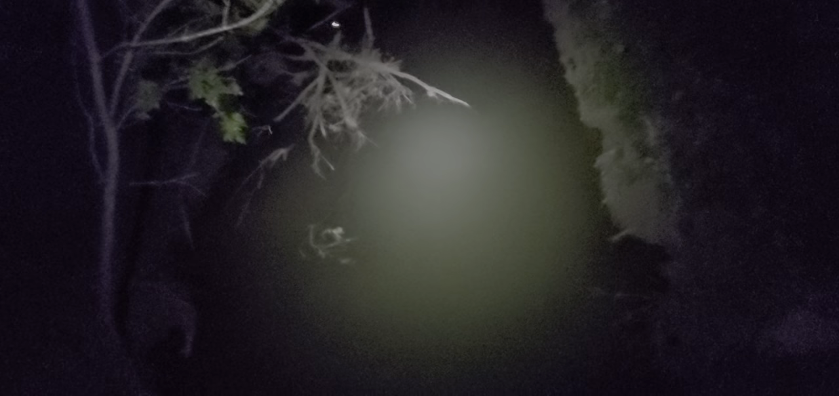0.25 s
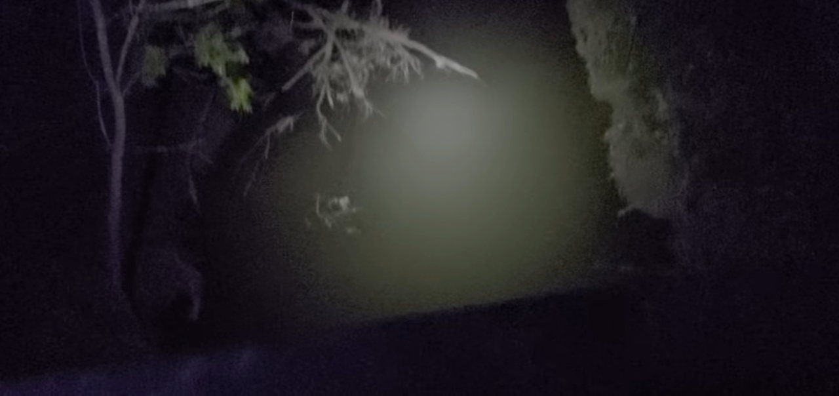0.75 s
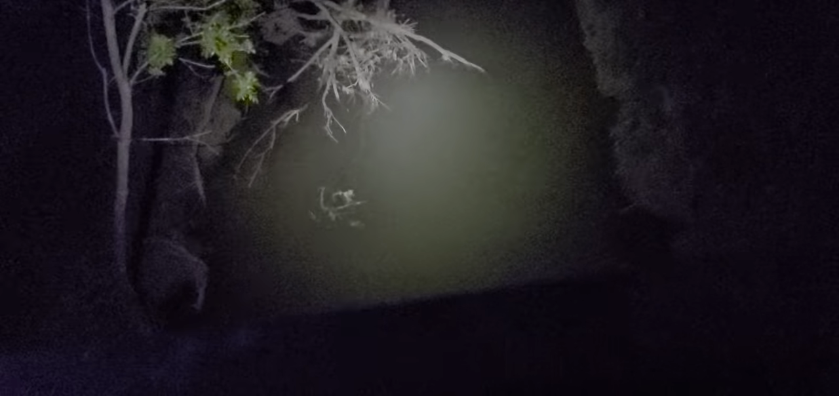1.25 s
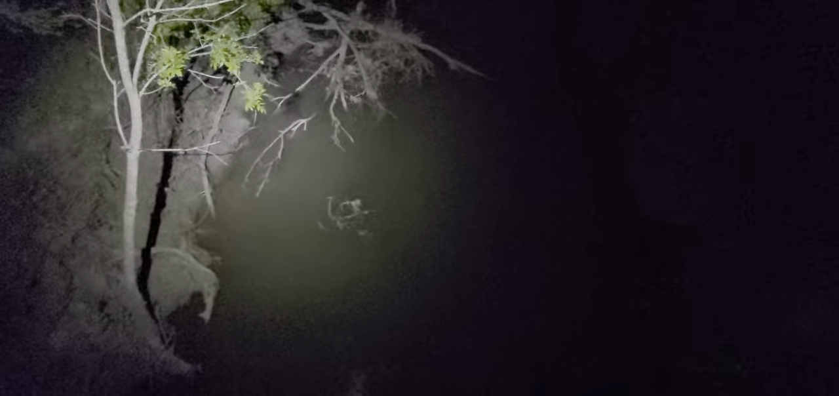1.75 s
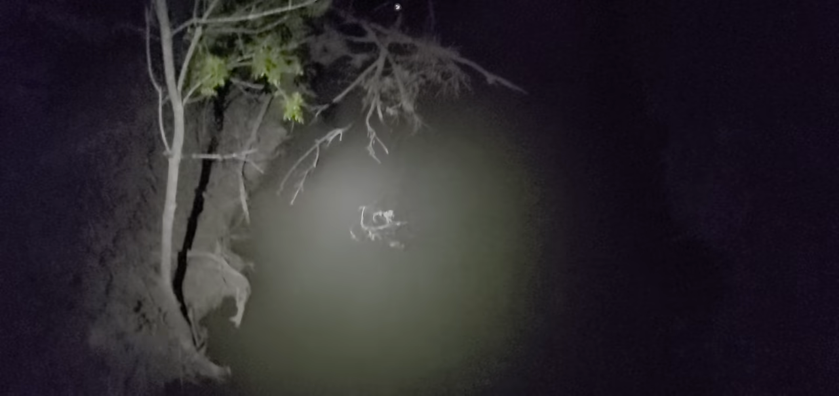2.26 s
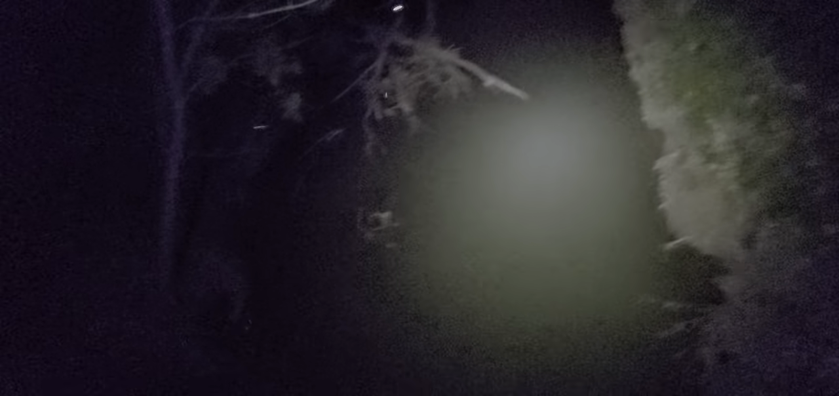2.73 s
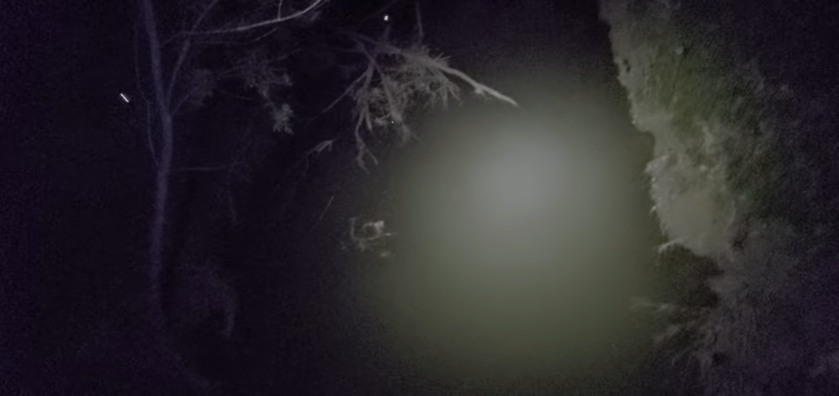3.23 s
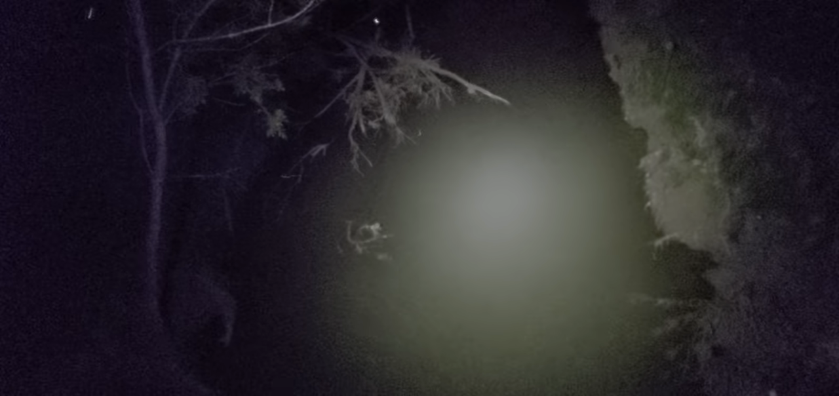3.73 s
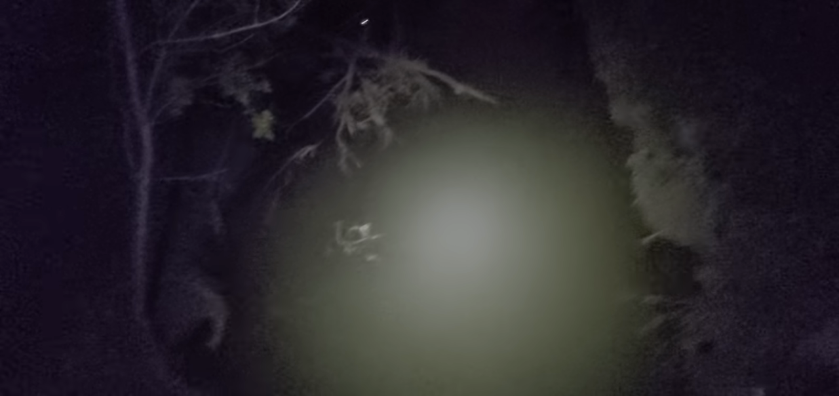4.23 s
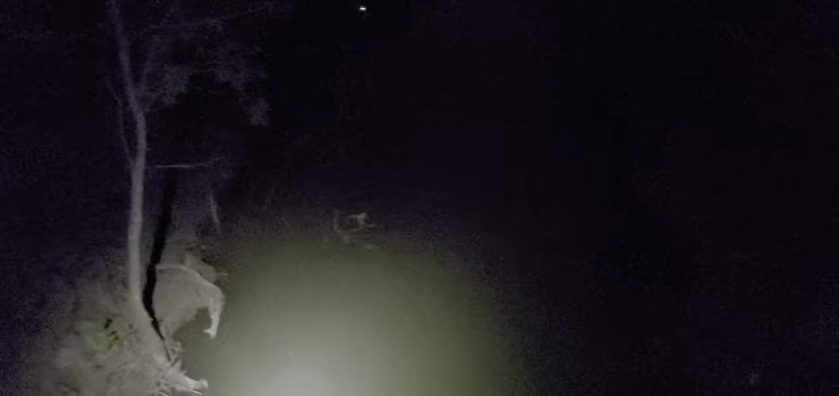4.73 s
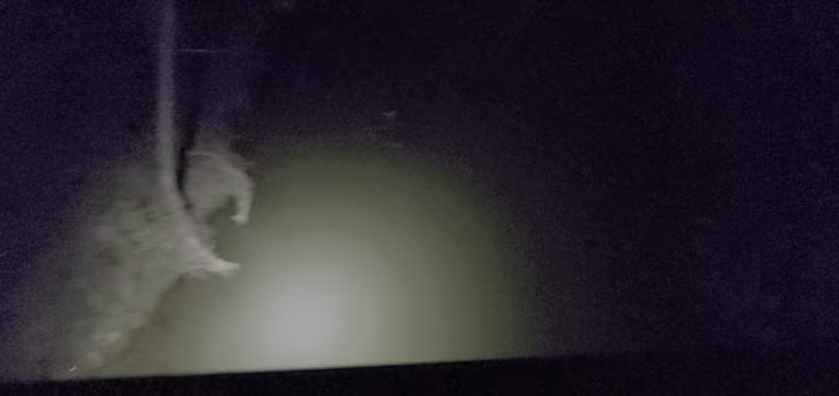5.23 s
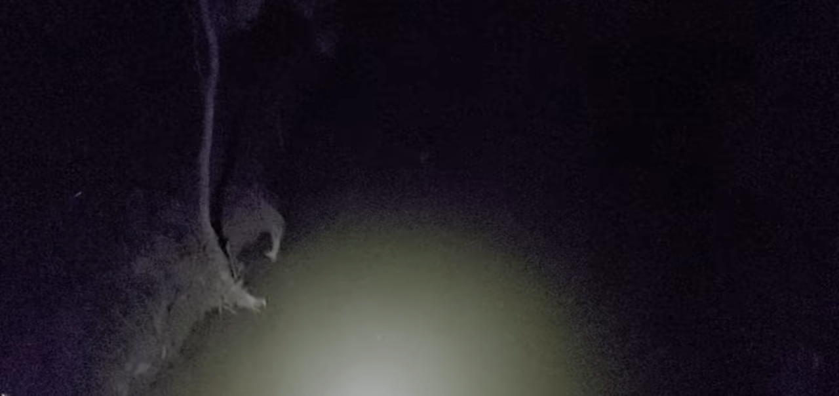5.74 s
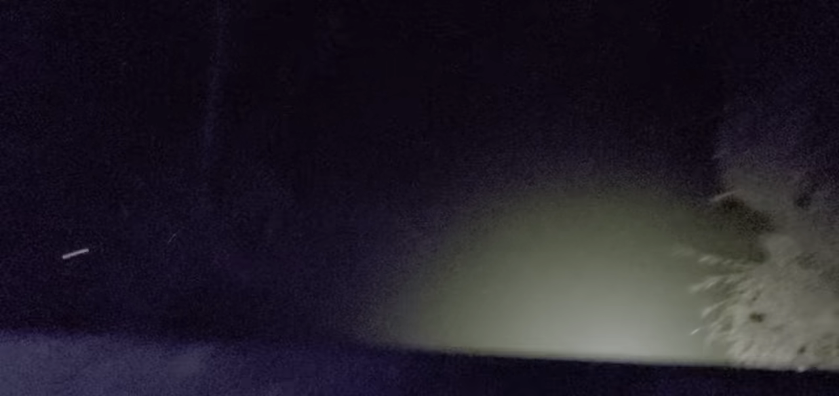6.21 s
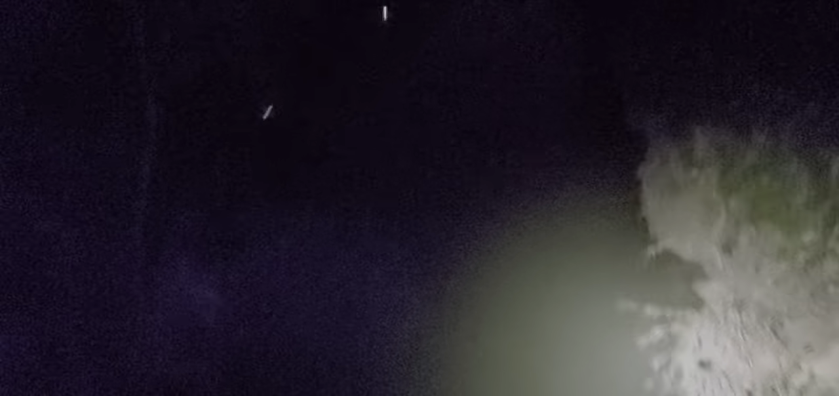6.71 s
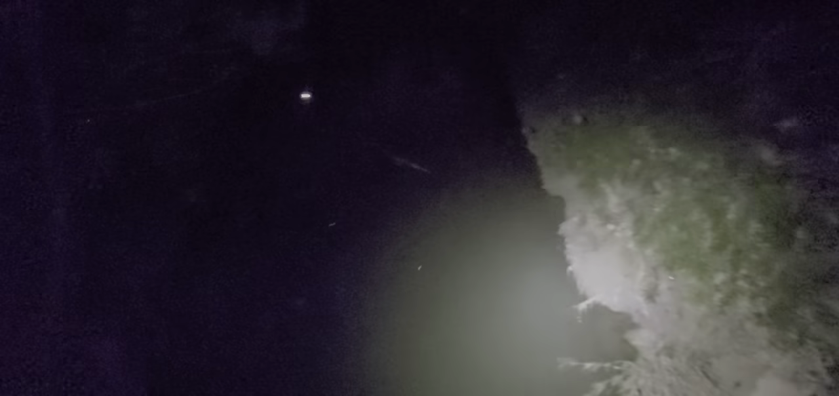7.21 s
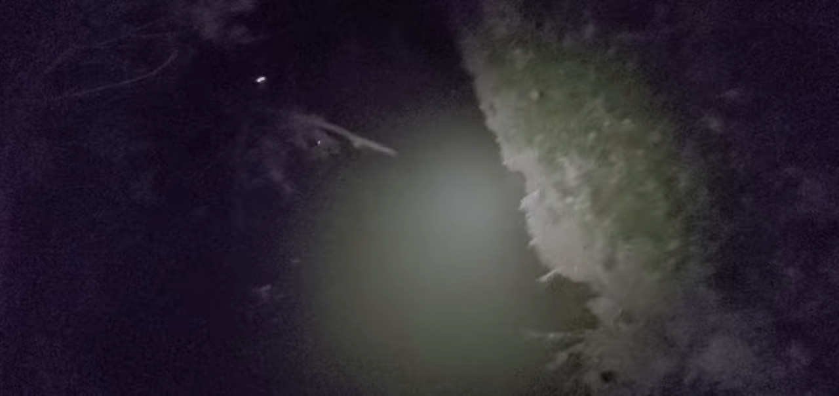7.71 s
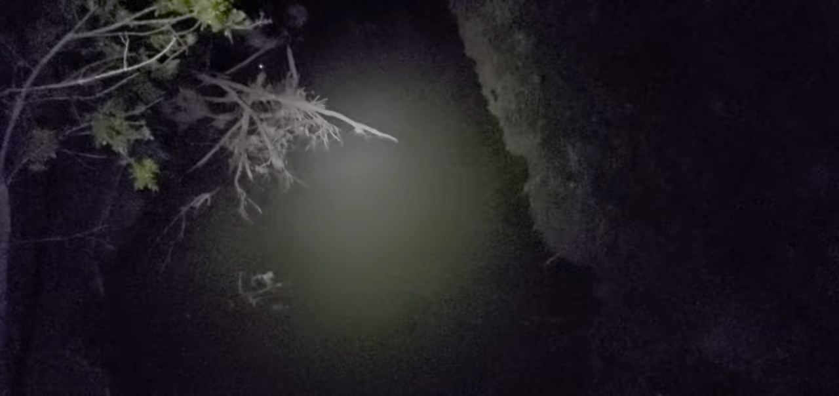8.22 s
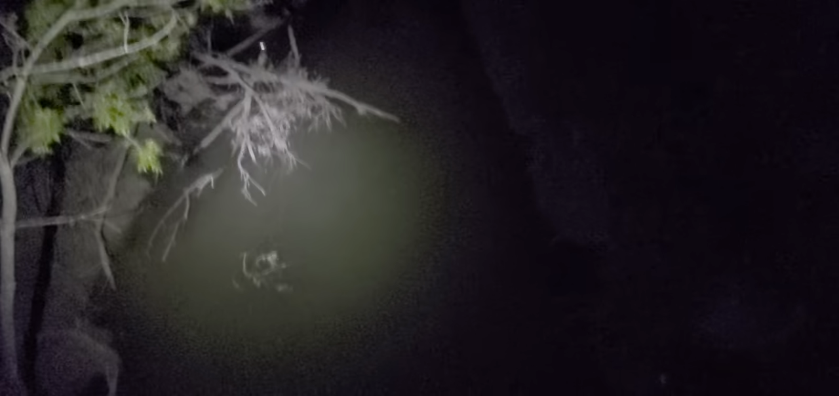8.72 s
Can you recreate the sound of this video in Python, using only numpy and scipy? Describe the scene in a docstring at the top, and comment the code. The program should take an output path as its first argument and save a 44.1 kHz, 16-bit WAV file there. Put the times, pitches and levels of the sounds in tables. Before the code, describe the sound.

Crickets trill and chirp at night by a murmuring creek over a low rumble, with a few sharp handling clicks and finger rubs.

```python
"""Crickets trill close by, at night on the bank of a creek. Behind them a dense chorus chirps, and a
katydid buzzes off to the right; all of them sing by scraping their wings. Water murmurs on the left,
over a low rumble and a far hum. The camera is hand-held, so some sounds are right at the microphone:
sleeves rustle, fingers rub and squeak on the right port, and the case ticks and bumps in the grip."""
import sys
import numpy as np
from scipy import signal
from scipy.fft import rfft, irfft, next_fast_len
from scipy.io import wavfile
from scipy.ndimage import uniform_filter1d, map_coordinates

SR = 44100
rng = np.random.default_rng(int(sys.argv[2]) if len(sys.argv) > 2 else 0)


def unload_audio(sound):
    """Save the sound as a 16-bit wav file, at the path given as the first command line argument."""
    columns = np.transpose(np.atleast_2d(sound))
    # keep every value between -1 and 1, then stretch to whole-number steps
    steps = np.round(np.clip(columns, -1, 1) * 32767)
    wavfile.write(sys.argv[1], SR, steps.astype(np.int16))


N = 395136

# Levels in the tables are relative: each source applies its own gain afterwards.
# The three near crickets. Each row: wing strokes a second, level in dB.
CRICKETS = [(50.88, -2.5), (44.1, -12.5), (56.9, -9.5)]
# Their loudness at the microphone. Each row: time in seconds, level in dB.
TRILL_LEVEL = [(0, -61), (1.04, -58.5), (2.2, -60), (2.6, -61), (4.2, -58), (5.1, -62.5), (6, -60),
               (6.6, -63), (7.35, -55.5), (8.96, -58)]
# Their bouts of song. Each row: start in seconds, length in seconds.
TRILL_BOUTS = [(0.018, 1.66), (1.82, 1.9), (3.878, 2.95), (6.93, 0.59), (7.69, 1.45)]
# Their distant kin. Each row: frequency in Hz, level in dB.
FAR_TRILL_SPECTRUM = [(2500, -51), (3900, -15), (4450, 3), (4800, -1.5), (5250, -15), (5600, -33),
                      (8000, -57)]
# The nearest ringing chirps. Each row: start in seconds, length in seconds, level in dB.
CHIRPS = [(0.016, 0.034, -53.5), (0.216, 0.08, -56), (0.433, 0.09, -57.0), (0.685, 0.05, -52.5),
          (0.807, 0.053, -59), (0.895, 0.076, -57.5), (1.108, 0.041, -56), (1.211, 0.083, -53),
          (1.329, 0.037, -51), (1.48, 0.097, -56), (1.594, 0.082, -52.5), (1.761, 0.062, -56.0),
          (1.845, 0.084, -52.0), (2.003, 0.11, -54), (2.155, 0.079, -58), (2.269, 0.075, -51),
          (2.406, 0.035, -59), (2.519, 0.026, -58), (2.651, 0.09, -56), (2.959, 0.051, -57),
          (3.023, 0.086, -55.5), (3.105, 0.053, -54), (3.165, 0.052, -50), (3.393, 0.048, -52),
          (3.481, 0.074, -52.5), (3.588, 0.046, -57), (3.887, 0.07, -51.5), (4.025, 0.029, -53),
          (4.116, 0.098, -52), (4.292, 0.061, -49.5), (4.446, 0.048, -50.0), (4.5, 0.1, -51.5),
          (4.667, 0.19, -53.5), (4.789, 0.1, -54), (5.026, 0.11, -53.5), (5.184, 0.041, -50.5),
          (5.309, 0.042, -53), (5.748, 0.033, -54.5), (6.47, 0.071, -62), (6.818, 0.029, -51.0),
          (6.976, 0.064, -53.0), (7.184, 0.047, -50.5)]
# The nearest raspy calls. Each row: start in seconds, length in seconds, level in dB.
RASPS = [(0.156, 0.025, -55.5), (0.231, 0.079, -63), (0.476, 0.036, -56.0), (0.581, 0.085, -59.5),
         (0.687, 0.072, -54.5), (0.796, 0.07, -54.5), (1.085, 0.069, -55), (1.273, 0.057, -59.5),
         (1.44, 0.077, -57.0), (1.607, 0.08, -59), (1.796, 0.09, -55), (1.904, 0.018, -51),
         (2.019, 0.073, -58), (2.197, 0.082, -53), (2.291, 0.079, -61), (2.405, 0.037, -56),
         (2.557, 0.029, -53), (2.66, 0.056, -53), (2.919, 0.035, -53), (3.002, 0.063, -58),
         (3.059, 0.09, -59), (3.156, 0.063, -60), (3.322, 0.086, -57.0), (3.412, 0.078, -60.0),
         (3.507, 0.11, -57.0), (3.745, 0.087, -55.5), (3.89, 0.076, -64), (3.982, 0.081, -58.5),
         (4.122, 0.076, -61), (4.238, 0.081, -54.5), (4.322, 0.1, -59), (4.447, 0.049, -57),
         (4.673, 0.027, -56), (4.732, 0.064, -50.5), (4.834, 0.072, -57.5), (5.036, 0.084, -55.5),
         (5.173, 0.11, -65), (5.325, 0.11, -54), (5.63, 0.082, -57.5), (5.997, 0.11, -57.5),
         (6.481, 0.082, -60.5), (6.638, 0.09, -61), (6.81, 0.09, -59), (6.896, 0.058, -57),
         (6.978, 0.12, -63), (7.178, 0.09, -56.0), (7.27, 0.13, -56), (7.357, 0.09, -59),
         (7.605, 0.055, -55), (8.047, 0.11, -64), (8.405, 0.13, -61), (8.805, 0.05, -58.5)]
# The callers farther back. Each row: time in seconds, level in dB.
CROWD_LEVEL = [(0, -65), (2.3, -60.5), (4.6, -62.5), (6.3, -64), (7.2, -61), (8.96, -62.5)]
# The katydid's two long buzzes. Each row: start in seconds, length in seconds, level in dB.
BUZZES = [(-.3, 5.96, -66.5), (6.2, 2.76, -69)]
# The tone of its wings. Each row: frequency in Hz, level in dB.
BUZZ_SPECTRUM = [(5000, -32), (6600, -6.5), (7700, -19), (8500, -4), (9700, -2), (10500, -5.5), (10900, 1),
                 (11200, -6), (11480, 3), (11800, -4.5), (12080, 2.5), (12950, -11), (13350, -15),
                 (16000, -34)]
# The creek's loudness from the bank. Each row: time in seconds, level in dB.
CREEK_LEVEL = [(0, -69.5), (1.7, -68), (2.1, -65), (2.7, -69), (3.15, -65.5), (3.95, -68), (4.9, -64.5),
               (6.7, -64), (7.15, -66), (8.1, -65), (8.96, -69)]
# The tone of the water. Each row: frequency in Hz, level in dB.
WATER_SPECTRUM = [(30, -43), (150, -12.5), (300, 4.5), (450, 1), (700, -1.5), (1100, -3.5), (1600, -11),
                  (2200, -22), (3500, -29.5), (6000, -35.5)]
# Soft plops. Each row: centre time in seconds, pitch in Hz, bandwidth in Hz, spread in seconds,
# level in dB, left over right in dB.
PLOPS = [(1.853, 1250, 130, 0.021, -55.5, 12), (1.855, 530, 201, 0.025, -54, 3),
         (1.856, 1490, 1810, 0.022, -61, 17), (1.979, 527, 188, 0.018, -48, 5)]
# Sleeve strokes by the microphone. Each row: start in seconds, length in seconds, level in dB.
SLEEVE_STROKES = [(1.54, .03, -80), (1.82, 0.068, -72), (1.93, .24, -79), (2.18, 0.079, -69.5),
                  (2.33, 0.18, -82), (2.6, 0.054, -68.5), (3.02, 0.039, -66.5), (3.2, 0.023, -70),
                  (3.25, 0.42, -76.5), (3.59, 0.037, -73), (3.84, 0.53, -83), (4.31, 0.032, -73),
                  (4.4, 0.11, -84), (4.66, 0.22, -79), (6.04, .04, -87), (6.63, 0.5, -81.5),
                  (7.35, 0.46, -72.5)]
# The tone of the cloth. Each row: frequency in Hz, level in dB.
CLOTH_SPECTRUM = [(1000, 0), (2500, -8), (4500, -3), (5600, -1), (6600, -2), (8500, -10.5), (11000, -10.5),
                  (16000, -17)]
# A finger slides by the port. Each row: start, length and rise in seconds, hiss in dB, grumble in dB.
RUBS = [(4.856, 0.068, .03, -66, -59.5), (5.226, 0.13, 0.057, -62, -55), (5.368, .1, 0.049, -49.5, -47),
        (5.506, .08, 0.092, -60.5, -85), (5.95, 0.12, 0.15, -65.5, -82), (6.578, .1, 0.11, -62, -70),
        (6.72, .33, .1, -69.5, -86), (7.057, 0.17, 0.21, -54, -82), (7.242, 0.035, 0.017, -63, -48.5),
        (7.306, 0.044, 0.06, -48.5, -49), (7.38, 0.065, 0.084, -53, -53), (7.455, 0.32, 0.12, -62.5, -91)]
# The hiss of sliding skin. Each row: frequency in Hz, level in dB.
SKIN_SPECTRUM = [(100, -8), (900, -4), (2400, -9), (4500, -8), (6500, -7.5), (7800, -9), (9000, -8),
                 (10700, -2), (12500, -1.5), (14500, -9), (16000, -6)]
# The case grumbling under it. Each row: frequency in Hz, level in dB.
CASE_SPECTRUM = [(20, -40), (50, -7), (110, 10.5), (220, 2), (400, -2.5), (900, -7.5), (2400, -14.5),
                 (4500, -16.5), (9000, -43)]
# The finger presses hard enough to squeak. Each row: start in seconds, length in seconds, level in dB.
SQUEAKS = [(5.38, 0.082, -43), (7.325, .04, -49)]
# Skin under pressure. Each row: frequency in Hz, level in dB.
SQUEAK_SPECTRUM = [(6000, -44), (10000, -18), (12500, 6), (14500, 2), (16000, -2)]
# Ticks on the case. Each row: start in seconds, then level, treble, thump and left over right in dB.
TICKS = [(0.684,-36,-32,-16.5,-18), (0.8066,-26,-13.5,-17,-32), (1.944,-41,-9,-3.5,-23),
         (2.0228,-39.5,-1.5,-7.5,-28), (2.109,-65,-15.5,-3,0), (4.349,-42.5,-12,-9,-20),
         (4.873,-34.5,-16,-8,-16), (6.001,-59,8.5,-3,-13), (6.06,-53,6,-3,-13), (6.069,-53.5,7,-10,-13),
         (6.769,-43,-12,-20,-18), (7.2483,-14,-5.5,-17.5,-36), (8.518,-42.5,-6.5,-5,-24)]
# The hand shifts its grip. Each row: start in seconds, level in dB, pitch in Hz, decay in seconds,
# left over right in dB.
BUMPS = [(0.805, -31, 395, 0.0027, -30), (0.81, -37, 79.5, 0.014, -8), (1.869, -44, 98.5, 0.047, -6),
         (4.763, -42, 50, 0.025, -7), (5.375, -30, 142, 0.0042, -23), (5.417, -46, 151, 0.014, -12),
         (6.651, -38.5, 194, 0.007, -21), (7.643, -34.5, 93, 0.013, -30), (8.518, -38, 126, 0.01, -23)]
# Soft taps of the hand. Each row: start in seconds, level in dB.
TAPS = [(7.64, -42), (7.801, -48), (7.816, -49), (7.833, -52), (7.85, -49), (7.909, -45.5), (7.992, -45)]
# The resonances of a tap. Each row: frequency in Hz, level in dB, seconds to fall by 60 dB.
TAP_MODES = [(1050, -6, .012), (1480, 2.5, 0.01), (1710, -7, 0.013)]
# The low rumble of the place. Each row: frequency in Hz, level in dB.
RUMBLE_SPECTRUM = [(15, -51), (25, -18), (43, -6), (58, 0), (85, 0.5), (115, -4.5), (153, -9), (210, -9.5),
                   (320, -17.5), (450, -29), (900, -73)]
# The bands of the far hum. Each row: centre in Hz, width in Hz, level in dB.
HUM_BANDS = [(56.9, 14, -61.5), (120, 5.6, -70), (239.8, 12, -67)]
# The hum comes and goes. Each row: time in seconds, level in dB.
HUM_LEVEL = [(0, -.5), (1.2, 1), (3.3, 2.5), (4.2, -1), (7, -1.5), (8.96, 0)]


def crickets():
    """Three near crickets trill at their own rates, each with a weak octave; far ones merge to a band."""
    wings = np.zeros(N)
    for rate, db in CRICKETS:
        stroke, phase = wing_strokes(rate, pitch_hz=4439, fall=.125, duty=.62,
                                     unsteady=.08, scatter_db=1.5)
        wings += amp(db + wobble(4.9)) * stroke ** 1.15 * (np.sin(phase) + amp(-17) * np.sin(2 * phase))
    near = hold_level(woods(wings, lead_ms=-0.026, wet_db=-9, t60=0.24), span_s=0.13)
    far = coloured(rng.standard_normal((2, N)), FAR_TRILL_SPECTRUM)
    bouts = swells([(s, length, 0) for s, length in TRILL_BOUTS], attack_s=.04, release_s=.025)
    singing = np.maximum(bouts, amp(-12))  # the trill dips between bouts
    return (near * singing * level(TRILL_LEVEL) * amp(-1) + amp(-61.5) * far) * pan(-2.7)


def wing_strokes(rate, pitch_hz, fall, duty, unsteady, scatter_db):
    """Envelope and phase of scraping wings: each stroke swells and fades while its pitch sags."""
    strokes = np.cumsum(rate * (1 + unsteady * wobble(25))) / SR + rng.random()
    size, detune = rng.standard_normal((4096, 2))[strokes.astype(int)].T
    progress = np.minimum(strokes % 1 / duty, 1)
    hz = pitch_hz * (1 + .005 * detune - fall * (progress ** 3 - 1 / 8))
    return np.sin(np.pi * progress) * amp(scatter_db * size), 2 * np.pi * np.cumsum(hz) / SR


def chorus():
    """Farther back, right of centre: ringing chirps, and raspy calls with a voice above and one below."""
    ringing = np.hypot(swells(CHIRPS, attack_s=.023, release_s=.028), amp(3.56) * crowd())
    rasping = np.hypot(swells(RASPS, attack_s=.029, release_s=.021), amp(-2.9) * crowd())
    t = np.arange(N) / SR
    lagging = np.interp(t - 0.005, t, rasping)  # a rasp starts high; its low voice follows
    middle = chirpers(ringing, rate=100, pitch_hz=3522, fall=.06, duty=.5, wet_db=1)
    low = chirpers(lagging, rate=120, pitch_hz=3114, fall=.09, duty=.37, wet_db=-0.5)
    high = chirpers(rasping, rate=120, pitch_hz=3757, fall=.05, duty=.4, wet_db=1.5)
    return (amp(2) * middle + amp(-2.73) * low + amp(0.8) * high) * pan(-6)


def chirpers(gain, rate, pitch_hz, fall, duty, wet_db):
    """Two insects of one pitch whose pulsed chirps swell together; uneven file teeth make them raspy."""
    wings = np.zeros(N)
    for _ in range(2):
        own_hz = pitch_hz * (1 + .012 * wobble(22))
        own_rate = rate * np.exp(.2 * wobble(6))
        stroke, phase = wing_strokes(own_rate, own_hz, fall, duty, unsteady=.15, scatter_db=4.5)
        wings += stroke * np.sin(phase + 0.8 * wobble(600))
    return hold_level(woods(wings, lead_ms=0.11, wet_db=wet_db, t60=0.1), span_s=0.054) * gain


def crowd():
    """Gain of the farther callers, who overlap at random."""
    return level(CROWD_LEVEL) * amp(2.1 * wobble(26))


def katydid():
    """Hard right, wings rasp on opening and on closing; leaves smear part of it into a steady sizzle."""
    cycle = np.cumsum(68.3 * (1 + 0.0022 * wobble(2))) / SR
    opening, closing = (np.exp(-((cycle - at) % 1) / 0.052) for at in (0, .42))
    strokes = (0.38 + opening + 0.55 * closing) * rng.standard_normal((2, N))
    buzzing = np.hypot(swells(BUZZES, attack_s=.3, release_s=.017), amp(-73))  # a far buzz carries on
    return coloured(strokes, BUZZ_SPECTRUM) * buzzing * amp([[-21], [-1]])


def creek():
    """Water to the left murmurs in small uneven surges, partly echoed by the banks."""
    flow = rng.standard_normal(N) * amp(2.8 * wobble(60))
    direct = unit(arriving(flow, lead_ms=0.41))
    water = coloured(direct + 0.77 * rng.standard_normal((2, N)), WATER_SPECTRUM)
    return water * level(CREEK_LEVEL) * amp(8 + 0.4 * wobble(8.6)) * pan(0.4)


def plops():
    """A couple of soft plops left of centre, made of brief swells of resonant noise."""
    t = np.arange(N) / SR
    return sum(amp(db) * np.exp(-.5 * ((t - s) / spread) ** 2) * noise_band(hz, width) * pan(balance_db)
               for s, hz, width, spread, db, balance_db in PLOPS)


def sleeves():
    """Cloth catches and lets go at both microphone ports, with sparse little snaps from its creases."""
    creases = unit(rng.standard_normal(N) * (rng.random(N) < 110 / SR))
    fibres = unit(rng.standard_normal((2, N)) * amp(1.9 * wobble(200) + 2 * wobble(65)))
    cloth = coloured(fibres + 0.19 * creases, CLOTH_SPECTRUM)
    return cloth * swells(SLEEVE_STROKES, attack_s=.022, release_s=.056) * amp(9.5)


def finger_rubs():
    """Skin sticks and slips on the right port, squeaking under pressure; the case grumbles beneath."""
    def friction(spectrum):
        return coloured(rng.standard_normal(N) * amp(1.4 * wobble(400)), spectrum)

    start, length, rise, hiss_db, grumble_db = np.transpose(RUBS)
    rise = rise[:, None]
    sliding = swells(np.c_[start, length, hiss_db], attack_s=rise, release_s=0.62 * rise)
    pressing = swells(np.c_[start, length, grumble_db], attack_s=rise, release_s=0.43 * rise)
    hiss = friction(SKIN_SPECTRUM) * sliding * amp(4)
    grumble = friction(CASE_SPECTRUM) * pressing * amp(7.5)
    squeak = friction(SQUEAK_SPECTRUM) * swells(SQUEAKS, attack_s=.04, release_s=.018)
    return (hiss + grumble + squeak) * amp([[-27], [0]])


def case_ticks():
    """The case gives and snaps back, and a short low push of air rings in the microphone port."""
    out = np.zeros((2, N + SR))
    size = 2048
    t, hz = np.arange(size) / SR, np.fft.rfftfreq(size, 1 / SR)
    for s, db, treble_db, thump_db, balance_db in TICKS:
        spectrum = [(40, -88), (300, 0), (1000, 4), (2600, 3 + 0.32 * treble_db),
                    (7000, treble_db - 0.5), (15000, treble_db - 4)]
        cepstrum = irfft(np.log(spectrum_gain(spectrum, hz)))
        snap = irfft(np.exp(rfft(2 * cepstrum[:size // 2], size) - cepstrum[0]))  # minimum-phase click
        scrape = amp(-41) * rng.standard_normal(size) * np.exp(-t / 0.0092)
        snap = snap + signal.fftconvolve(snap, scrape)[:size]
        snap = signal.lfilter([-.5, 1], [1, -.5], snap)  # spread to a two-sided click with a lower peak
        thump = amp(thump_db + 11.5) * np.sin(2 * np.pi * 190 * t) * np.exp(-t / 0.003)
        out[:, round(s * SR):][:, :size] -= amp(db) * (amp(16.5) * snap + thump) * pan(balance_db)
    return out[:, :N]


def grip():
    """The hand shifts on the camera: dull bumps and small woody taps, mostly on the right."""
    out = np.zeros((2, N + SR))
    t = np.arange(SR // 4) / SR
    for s, db, hz, decay, balance_db in BUMPS:
        envelope = 2 * t / decay * np.exp(1 - 2 * t / decay)
        bump = envelope * np.sin(2 * np.pi * hz * t)
        out[:, round(s * SR):][:, :len(t)] += amp(db) * bump * pan(balance_db)
    for s, db in TAPS:
        ring = sum(amp(mode_db + 2 * rng.normal() - 60 * t / t60) * np.sin(2 * np.pi * hz * t)
                   for hz, mode_db, t60 in TAP_MODES)
        out[:, round(s * SR):][:, :len(t)] += amp(db - 4.5) * ring * pan(-23)
    return out[:, :N]


def distant_trill():
    """One faint trill a long way off: a narrow band of noise swells and fades."""
    gain = swells([(6.72, .63, -76)], attack_s=.22, release_s=.05)
    return gain * noise_band(centre_hz=2280, width_hz=120) * pan(3)


def rumble_and_hum():
    """Behind everything, a wavering low rumble with a far hum in it."""
    direct = arriving(rng.standard_normal(N), lead_ms=0.077)
    rumble = coloured(direct + .5 * rng.standard_normal((2, N)), RUMBLE_SPECTRUM)
    hum = sum(amp(db) * noise_band(hz, width) for hz, width, db in HUM_BANDS)
    return (rumble * amp(-50.5 + 1.25 * wobble(9.7)) + hum * level(HUM_LEVEL)) * pan(-0.46)


def woods(x, lead_ms, wet_db, t60):
    """Direct sound plus ever-changing diffuse scatter from trunks and banks, at rms 1."""
    block, size = 4096, 16384
    pieces = np.pad(x, (0, -N % block)).reshape(-1, block)
    t = np.arange(size - block) / SR
    tails = rng.standard_normal((2, len(pieces), len(t)), dtype=np.float32) * amp(-60 * t / t60)
    echoes = irfft(rfft(tails, size) * rfft(pieces, size), size)  # each piece has its own tail
    scatter = np.zeros((2, N + size))
    for k in range(len(pieces)):
        scatter[:, k * block:k * block + size] += echoes[:, k]
    return unit(unit(arriving(x, lead_ms)) + amp(wet_db) * unit(scatter[:, :N]))


def arriving(x, lead_ms):
    """A source off to one side reaches the left port lead_ms before the right."""
    lead_s = lead_ms / 1000 * np.array([[.5], [-.5]])
    return filtered(x, lambda hz: np.exp(2j * np.pi * hz * lead_s))


def pan(balance_db):
    """Left and right gains whose mean is 1; positive is to the left."""
    ratio = amp(balance_db)
    return np.array([[2 * ratio], [2]]) / (1 + ratio)


def swells(rows, attack_s, release_s):
    """Gain per sample of (s, length s, dB) events that rise, hold and die away; overlaps add in power."""
    coarse = np.arange(0, N + 64, 64)
    start, length, db = np.transpose(rows)[:, :, None]
    age = coarse / SR - start
    rise = np.sin(np.pi / 2 * np.clip(age / attack_s, 0, 1))
    fade = np.exp(-np.maximum(age - length, 0) / release_s)
    return np.interp(np.arange(N), coarse, np.linalg.norm(amp(db) * rise * fade, axis=0))


def level(rows):
    """(s, dB) rows as one gain per sample."""
    s, db = np.transpose(rows)
    return amp(np.interp(np.arange(N) / SR, s, db))


def hold_level(x, span_s):
    """Hold the loudness of a stereo sound at 1 over stretches of span_s."""
    power = uniform_filter1d(np.mean(x, 0) ** 2, int(span_s * SR))
    return unit(x / np.sqrt(np.abs(power) + 1e-9))


def wobble(rate):
    """A smooth random curve, rate knots a second."""
    knots = rng.standard_normal(4096)
    coarse = np.arange(0, N + 64, 64)
    return np.interp(np.arange(N), coarse, map_coordinates(knots, [coarse * rate / SR], mode="wrap"))


def noise_band(centre_hz, width_hz):
    """Noise in one resonance, at rms 1."""
    noise = rng.standard_normal(N)
    return unit(filtered(noise, lambda hz: 1 / (1 + (2 * (hz - centre_hz) / width_hz) ** 2)))


def coloured(x, spectrum):
    """x shaped by a (Hz, dB) spectrum, at rms 1."""
    return unit(filtered(x, lambda hz: spectrum_gain(spectrum, hz)))


def spectrum_gain(spectrum, hz):
    """Gain at hz, between (Hz, dB) points on a log axis."""
    points_hz, db = np.transpose(spectrum)
    return amp(np.interp(np.log(hz + 1), np.log(points_hz + 1), db))


def filtered(x, response):
    """x through a complex response of frequency."""
    size = next_fast_len(N + SR // 4)
    return irfft(rfft(x, size) * response(np.fft.rfftfreq(size, 1 / SR)), size)[..., :N]


def amp(db):
    """Decibels to gain."""
    return 10 ** (np.asarray(db) / 20)


def unit(x):
    """Scale to rms 1."""
    return x / np.sqrt(np.mean(x ** 2) + 1e-20)


def scene():
    """Insects and water around the bank, and the hand right at the microphone."""
    night = crickets() + chorus() + katydid() + creek() + rumble_and_hum() + plops() + distant_trill()
    return night + sleeves() + finger_rubs() + case_ticks() + grip()


def record(dry):
    """The camera keeps nothing above its band limit."""
    return filtered(dry, lambda hz: hz < 15800)


dry = scene()
out = record(dry)
unload_audio(out)
```